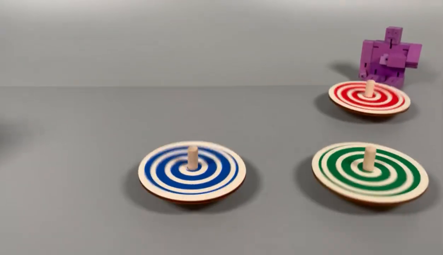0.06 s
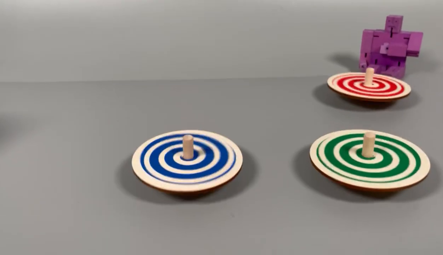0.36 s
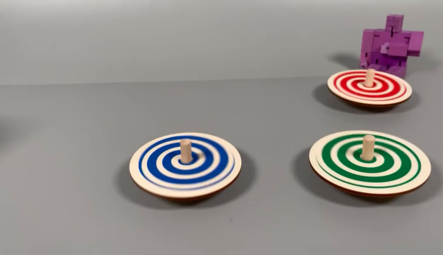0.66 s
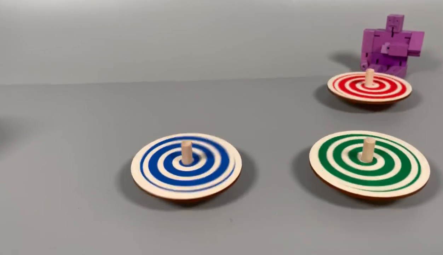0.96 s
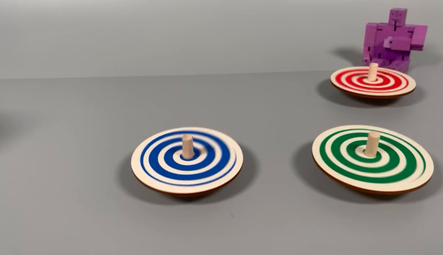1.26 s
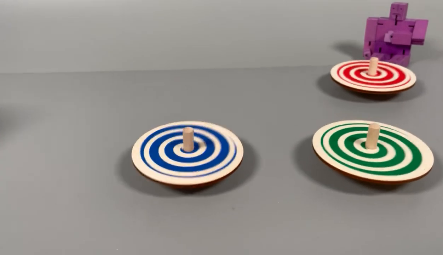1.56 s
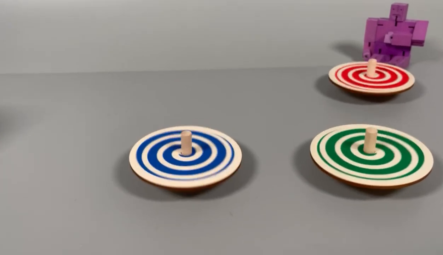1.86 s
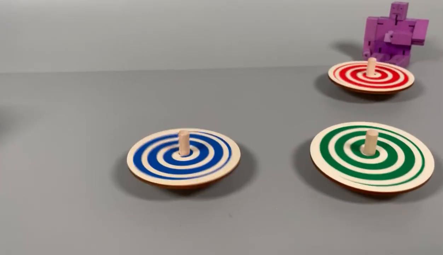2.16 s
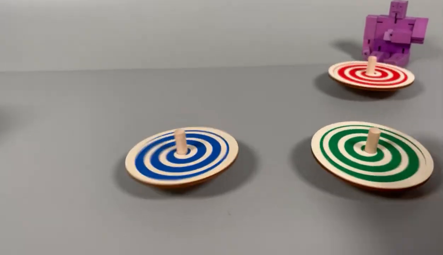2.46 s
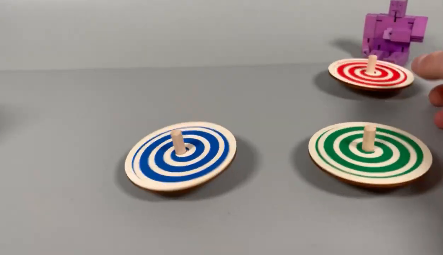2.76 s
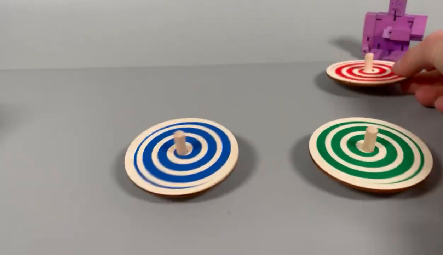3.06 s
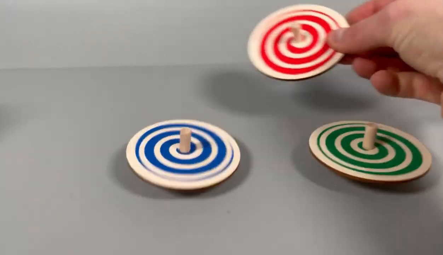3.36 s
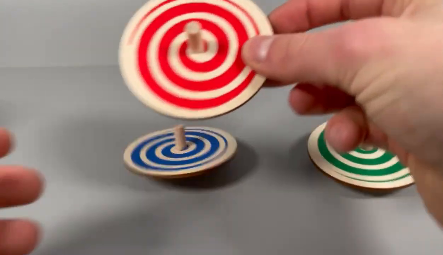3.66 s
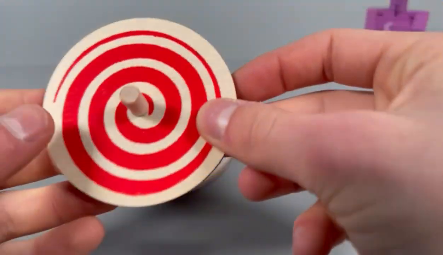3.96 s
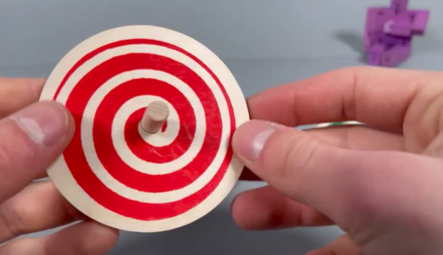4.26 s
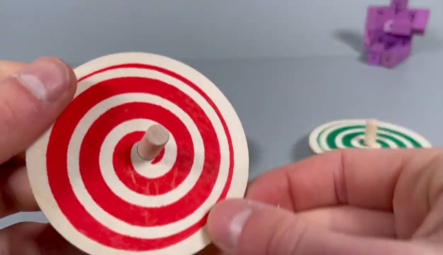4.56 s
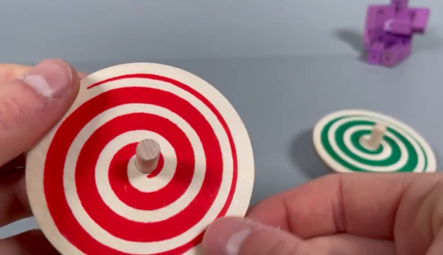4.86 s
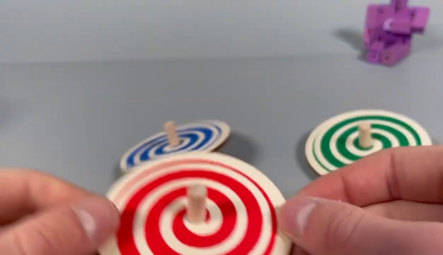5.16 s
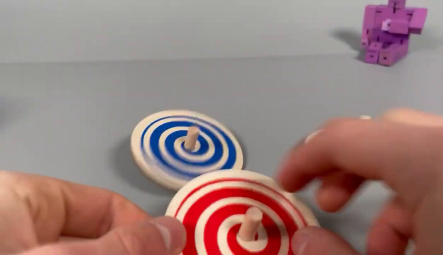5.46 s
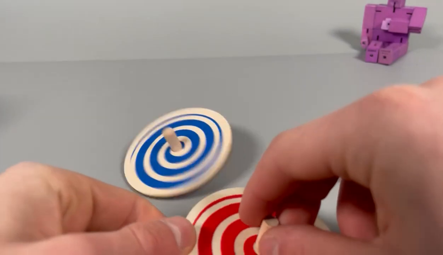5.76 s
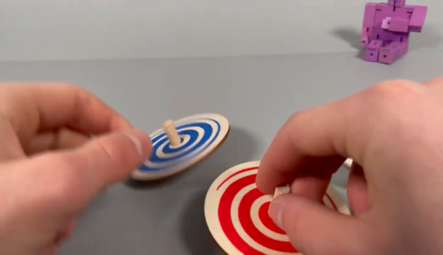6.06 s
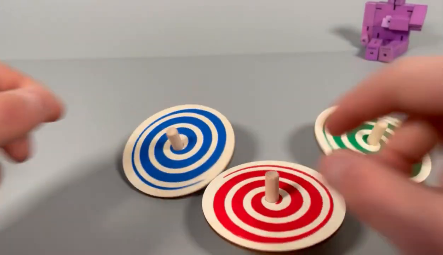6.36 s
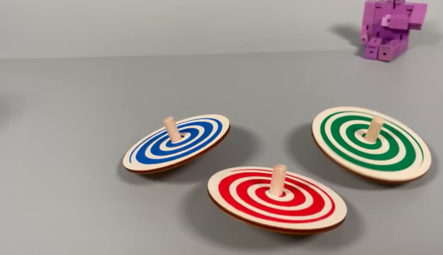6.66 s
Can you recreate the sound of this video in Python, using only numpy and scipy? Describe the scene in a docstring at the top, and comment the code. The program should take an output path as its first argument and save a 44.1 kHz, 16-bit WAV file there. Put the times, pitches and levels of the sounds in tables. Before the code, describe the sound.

Close to a phone microphone in a small room, wooden spinning tops rumble quietly on a tabletop with light clicks and taps. About halfway, one loud knock rings the table as a top is lifted. Soft sleeve swishes and a faint hiss of fingertips follow, then a scratchy rubbing of skin on wood, ending in a second, softer knock as the top is put down.

```python
"""A low rumble, dry clicks and swishing sleeves: three wooden tops wobble on a table in a small room.
Their tips rumble in the board, and a hand knocks the table, setting it ringing, as it picks one top up.
Fingers slide over the disc, rub along it in small slips that ring the wood, and set it down again.
It is all heard close up, through the two microphone ports of a phone."""
import sys
import numpy as np
from scipy import signal
from scipy.fft import rfft, irfft
from scipy.io import wavfile
from scipy.ndimage import uniform_filter1d

SR = 44100
rng = np.random.default_rng(int(sys.argv[2]) if len(sys.argv) > 2 else 0)


def pcm_store(signal):
    """Save signal as 16-bit PCM."""
    levels = np.round(np.clip(np.atleast_2d(signal), -1, 1) * 32767)
    wavfile.write(sys.argv[1], SR, levels.astype(np.int16).T)


N = 295911
T = np.arange(N) / SR
FREQ = np.arange(N + 1) * SR / (2 * N)

# The bright hiss of sliding skin and cloth. Each row: frequency in Hz, level in dB.
SLIDE_HISS = [(2500, -21), (5400, -16.5), (6500, -9), (7500, -11.5), (9300, -5.5), (11600, -9.5),
              (14000, -31)]
# Knocks on the table. Each row: start in seconds, level in dB, thud pitch in Hz, thud t60 in seconds,
# edge and board ring in relative dB, frequency in Hz above which the board is barely excited.
KNOCKS = [(0.932, -40.5, 555, 0.02, -31, -12, 800), (1.011, -41.5, 522, 0.053, -5, -27, 800),
          (1.117, -39.5, 521, 0.036, -19, -2, 800), (1.631, -38, 606, 0.017, -2.5, -7, 900),
          (3.0747, -3, 762, 0.0086, -4, 3.5, 1630), (5.3899, -35.5, 751, 0.0035, 7, 11, 810),
          (5.398, -37.5, 440, 0.028, -15, -15, 600), (5.528, -44, 1600, 0.008, 4, -7, 1000),
          (6.43, -16.5, 572, 0.0094, -10.5, 0.5, 765), (6.464, -33, 532, 0.02, -18, -9, 700)]
# Pressure of the fingers rubbing the held top. Each row: time in seconds, level in dB.
RUB_PRESSURE = [(5.269, -77), (5.286, -55), (5.378, -62), (5.44, -73), (5.5, -60), (5.57, -69),
                (5.61, -52.5), (5.852, -53), (5.94, -54.5), (6.07, -49), (6.17, -50.5), (6.26, -52.5),
                (6.42, -58.5)]


def amp(db):
    """Decibels to gain."""
    return 10 ** (np.asarray(db) / 20)


def noise():
    """White noise of unit power."""
    return rng.standard_normal(N)


def through(x, response):
    """Filter by a frequency response given on FREQ."""
    return irfft(rfft(x, 2 * N) * response)[..., :N]


def unit(response):
    """Scale a response so that white noise keeps its power."""
    return response / np.sqrt(np.mean(np.abs(response) ** 2))


def colour(points):
    """Causal response through (Hz, dB) points, falling 10 dB an octave outside them."""
    hz, db = np.transpose(points)
    octave = np.log2(FREQ + 1)
    outside = np.abs(octave - np.clip(octave, np.log2(hz[0]), np.log2(hz[-1])))
    cepstrum = irfft(np.log(amp(np.interp(octave, np.log2(hz), db) - 10 * outside)))
    return unit(np.exp(rfft(2 * cepstrum[:N], 2 * N)))


def resonances(peaks):
    """Response of parallel (Hz, width in Hz, dB) resonators."""
    return unit(sum(amp(db) * 1j * FREQ * width / (hz ** 2 - FREQ ** 2 + 1j * FREQ * width)
                    for hz, width, db in peaks))


def ring(modes, t):
    """Fading sines of (Hz, dB, t60 in seconds) modes, alternating in sign."""
    return sum((-1) ** k * amp(db - 60 * t / t60) * np.sin(2 * np.pi * hz * t)
               for k, (hz, db, t60) in enumerate(modes))


def add(track, s, sound):
    """Mix a sound into a track at s seconds."""
    start = max(int(s * SR), 0)
    track[start:start + len(sound)] += sound[:N - start]


def swell(t, rise, t60, hold=0):
    """A quick rise, a hold, then an exponential fade."""
    return np.clip(t / rise, 0, 1) * np.exp(-np.log(1000) * np.maximum(t - rise - hold, 0) / t60)


def walk(rate):
    """Random wander with a spread near 1, turning `rate` times a second."""
    size = int(SR / rate)
    return uniform_filter1d(np.repeat(rng.standard_normal(N // size + 1), size), size)[:N]


def burst(shape, bins):
    """Noise under an envelope, its spectrum evened out over `bins` so that no chance pitch sticks out."""
    spectrum = rfft(shape * rng.standard_normal(len(shape)), 2 * len(shape))
    power = signal.fftconvolve(np.abs(spectrum) ** 2, signal.windows.hann(bins), mode="same")
    flat = irfft(spectrum / np.sqrt(power))[:len(shape)]
    return flat * np.linalg.norm(shape) / np.linalg.norm(flat)


def room_tone(level_db=-69):
    """Still room noise, alike on both sides in the bass."""
    tone = colour([(25, -9), (120, 8), (370, -9.5), (3500, -27), (7500, -32.5),
                   (11800, -34.5), (13500, -51)])
    side = through(noise(), tone * np.minimum(FREQ / 1200, .8))
    return amp(level_db) * (through(noise(), tone) + np.array([side, -side]))


def table_rumble(wobble_db=-2.5, settled_db=-74.5, hand_db=-16, uneven_db=2):
    """Wobbling tips and rubbing hands rumble in the board; deep down it sways in one broad swell."""
    # The push of the wobbling tops. Each row: time in seconds, level in dB.
    wobble = [(0.52, -68), (1.02, -56), (1.45, -61), (1.68, -54.5), (1.89, -82), (1.96, -58.5),
              (2.6, -67.5), (2.7, -73)]
    # The tone of the rumble. Each row: frequency in Hz, level in dB.
    rumble_tone = [(50, -9.5), (120, 1), (200, -2.5), (300, -13), (600, -15), (1200, -28), (3000, -29)]
    s, db = np.transpose(wobble)
    tips = amp(np.interp(T, s, db) + wobble_db) * (T >= s[0]) * (T <= s[-1])
    push = np.maximum(tips, amp(settled_db)) + amp(hand_db) * rub_pressure()
    sway = amp(-73.5 + 16 * np.exp(-((T - 1.55) / 0.87) ** 2))
    rumble = through(noise() + 0.26 * np.array([noise(), noise()]), colour(rumble_tone))
    bass = through(noise(), resonances([(50.7, 14, 0)]) * resonances([(53.5, 10, 0)]))
    return (rumble * push + bass / np.std(bass) * sway) * amp(uneven_db * walk(11))


def sleeves(scuff_db=-37, hum_db=-14):
    """Cloth brushes in short swishes, each round its own pitch, after one duller, heavier scuff."""
    # Each row: start in seconds, level in dB, treble in relative dB, band centre in Hz,
    # band level in relative dB.
    swishes = [(0.297, -60.5, -20, 1080, 12.5), (0.549, -64, -1, 3120, 13.5), (0.689, -63.5, -16, 3700, 10),
               (.82, -62, -4.5, 2800, -7), (1.475, -58, -7, 3560, -16), (1.578, -60.5, -10, 2240, 11.5),
               (1.755, -66, -9.5, 3900, 10), (1.921, -63, 2.5, 2760, 19), (2.294, -62, -17, 1830, 2),
               (2.941, -62, 2, 5000, 15), (3.374, -86.5, -9.5, 6040, 17.5), (3.451, -80, -11, 5440, 13),
               (3.601, -75.5, -26, 3820, 18.5), (3.683, -67.5, -16.5, 3880, 9),
               (3.792, -71.5, -10.5, 3700, 5.5), (3.888, -70, -21, 3830, 11), (3.949, -74.5, -5, 4080, 9),
               (4.136, -81, -14, 3530, 15.5), (4.226, -75, -8.5, 3940, 9), (4.315, -67.5, -8, 1494, 3),
               (4.567, -68.5, -3.5, 3190, 12.5), (4.766, -70, -11, 2463, 15), (4.96, -67.5, -16, 2300, 1.5),
               (5.105, -73.5, -19.5, 4100, 9)]
    # The tones of the swishes and of the scuff. Each row: frequency in Hz, level in dB.
    cloth_tone = [(300, 5), (1200, 5), (4000, -0.5), (7000, -10.5), (11500, -18.5), (14000, -44.5)]
    scuff_tone = [(120, -6), (400, -10), (800, 0), (1350, 2.5), (2000, -7.5), (3800, -21), (11200, -22),
                  (14000, -31)]
    body, treble, bands, t = np.zeros(N), np.zeros(N), np.zeros(N), T[:SR]
    for s, db, treble_db, hz, band_db in swishes:
        shape = amp(db) * swell(t, rise=0.015, t60=0.34)
        band = np.concatenate(signal.iirpeak(hz, Q=2.3, fs=SR))
        add(body, s, shape)
        add(treble, s, shape * amp(treble_db))
        add(bands, s, shape * amp(band_db) * signal.sosfilt([band, band], rng.standard_normal(len(t))))
    cloth = through(body * noise(), colour(cloth_tone)) + bands
    cloth += through(treble * noise(), colour(SLIDE_HISS))
    scuff = amp(scuff_db) * swell(T, rise=0.0051, t60=0.14) * noise()
    table_hum = amp(hum_db) * resonances([(170, 140, 0)])
    return cloth * amp(0.79 * walk(120)) + through(scuff, colour(scuff_tone) + table_hum)


def clicks(fade_s, ping_db, rise_s=0.0039, fade_from_s=0.0041, ping_t60=0.004):
    """Each dry click is a few milliseconds of chatter that rings one short resonance."""
    # Each row: start in seconds, level in dB, ring pitch in Hz, ring level in relative dB.
    snaps = [(0.344, -35, 4970, 2), (0.945, -32, 4180, -1.5), (0.955, -48, 4270, -3),
             (1.0788, -35.5, 5130, 0.5), (1.0831, -43.5, 4730, -20), (1.199, -38, 4600, 7.5),
             (1.2109, -42.5, 4380, 3), (1.3479, -37, 4170, 4), (2.007, -33, 4550, 4),
             (2.138, -35.5, 4930, -8), (2.145, -37, 4500, -2.5), (3.030, -30.5, 4900, -2),
             (3.043, -29.5, 5287, -5), (5.2179, -52, 8900, 5.5)]
    # The tone of the chatter. Each row: frequency in Hz, level in dB.
    chatter_tone = [(100, -14.5), (500, 2), (1300, -1), (2500, -12), (3600, -3), (5500, 4.5), (7000, -4.5),
                    (8100, 5), (9700, -1), (11600, 7), (12700, -2), (14000, -39.5)]
    chatter, pings, t = np.zeros(N), np.zeros(N), T[:SR // 4]
    shape = np.minimum(t / rise_s, 1) * np.exp(-np.maximum(t - fade_from_s, 0) / fade_s)
    for s, db, hz, ring_db in snaps:
        snap = burst(shape, bins=400)
        ping = signal.fftconvolve(snap, ring([(hz, 0, ping_t60)], t))
        ping *= np.linalg.norm(snap) / np.linalg.norm(ping)
        add(chatter, s, amp(db) * snap)
        add(pings, s, amp(db + ring_db + ping_db) * ping)
    return through(chatter, colour(chatter_tone)) + pings


def after_ring(start_s=0.347):
    """The first click leaves a top ringing thinly in a close pair of modes."""
    return ring([(4830, -64, .2), (4700, -66, .3)], np.maximum(T - start_s, 0))


def knocks(edge_t60, tick_db, tick_growth=2.5, lag_s=.0007, return_s=.0071, return_db=-16.5):
    """A blow gives a bright edge, then a hard tick and a thud that run to and fro in the table."""
    # The modes of the tick. Each row: pitch in Hz, level in dB, t60 in seconds.
    tick_modes = [(4140, -6.5, .0095), (4220, -14.5, .008)]
    # The tone of the edge. Each row: frequency in Hz, level in dB.
    edge_tone = [(300, 6), (1000, -5.5), (1250, -3), (1800, -4), (2300, -13), (2800, -6), (3200, -8),
                 (4000, -10.5), (4600, -16), (6400, -15), (9500, -23), (11400, -13), (13500, -21)]
    wood, edges, t = np.zeros(N), np.zeros(N), T[:SR // 4]
    for s, db, hz, t60, edge_db, _, _ in KNOCKS:
        thud = ring([(hz, 0, t60)], t) * np.minimum(6 * t / t60, 1)  # longer thuds swell more slowly
        tick = amp(tick_growth * db + tick_db) * ring(tick_modes, t)  # harder contacts are brighter
        edge = burst(swell(t, rise=0.0013, t60=edge_t60), bins=300)
        add(wood, s + lag_s, amp(db + 4) * thud + tick)
        add(edges, s, amp(db + edge_db - 8) * edge)
    # Each return from the table's rim is weaker and duller.
    round_trip = amp(return_db) * np.exp(-2j * np.pi * FREQ * return_s) / (1 + (FREQ / 2000) ** 2)
    return through(wood, 1 / (1 - round_trip)) + through(edges, colour(edge_tone))


def board_ring(spread=.6):
    """Every knock leaves the table ringing, a soft one only in its low modes."""
    # The modes of the board. Each row: pitch in Hz, level in dB, t60 in seconds.
    board_modes = [(76, -30, .33), (148, -30, .28), (216, -33, .22), (271, -36, .18), (306, -26.5, .21),
                   (380, -24, .18), (470, -26, .07), (500, -25, .09), (535, -23, .09), (585, -24, .14),
                   (647, -24, .13), (714, -25, .13), (792, -25, .11), (861, -25, .13), (953, -29, .14),
                   (1005, -28, .12), (1071, -26, .13), (1260, -29, .06), (1400, -29, .06), (1576, -39, .13),
                   (1802, -34, .12), (1947, -33, .08)]
    mid, t = np.zeros(N), T[:SR // 3]
    filling = np.minimum(t / 0.012, 1)  # bending waves take a moment to fill the board
    for s, db, _, _, _, board_db, cutoff_hz in KNOCKS:
        modes = [(hz, mode_db - 10 * np.log10(1 + (hz / cutoff_hz) ** 6), t60)
                 for hz, mode_db, t60 in board_modes]
        add(mid, s, amp(db + board_db) * ring(modes, t) * filling)
    # The broad board reaches each port a little differently.
    side = through(mid, spread * np.minimum(FREQ / 500, 1) * np.exp(-2j * np.pi * FREQ * 0.002))
    return mid + np.array([side, -side])


def bumps(hum_hz=141, width_hz=110):
    """Soft pushes of tops and hands on the table give only a brief low hum."""
    # Each row: start in seconds, level in dB.
    pushes = [(1.63, -53.5), (1.96, -55.5), (4.049, -65), (4.77, -64), (4.97, -57), (5.29, -59.5),
              (5.385, -52), (6.03, -59)]
    push = sum(amp(db) * swell(T - s, rise=0.021, t60=0.51) for s, db in pushes)
    return through(push * noise(), unit(resonances([(hum_hz, width_hz, 0)]) ** 2))


def finger_strokes(rise_s=0.04, grain_db=2):
    """Fingertips hiss faintly as they slide over the smooth disc."""
    # Each row: start in seconds, length in seconds, level in dB.
    strokes = [(2.684, 0.44, -74.5), (4.019, 0.14, -75), (4.247, 0.32, -74.5), (4.375, 0.058, -72.5),
               (4.553, 0.17, -71), (4.737, 0.13, -75.5), (4.893, 0.14, -64), (6.469, 0.16, -72.5)]
    pressure = sum(amp(db) * swell(T - s, rise_s, t60=0.063, hold=length - rise_s)
                   for s, length, db in strokes)
    return through(noise() * pressure * amp(grain_db * walk(270)), colour(SLIDE_HISS))


def rub_pressure():
    """The fingers press on the held top, then let go."""
    s, db = np.transpose(RUB_PRESSURE)
    return amp(np.interp(T, s, db)) * swell(T - s[0], rise=0.0032, t60=1, hold=s[-1] - s[0])


def stick_slip(level_db=-4, slips_per_s=46, octaves_per_s=2.9, jerkiest_s=5.63):
    """Friction force: the slips come faster as the fingers speed up, and are jerkiest partway through."""
    rate = slips_per_s * 2 ** (octaves_per_s * np.maximum(T - RUB_PRESSURE[0][0], 0))
    phase = np.cumsum(rate * np.exp(.12 * walk(80))) / SR
    jerk_db = 11 + 14 * np.exp(-((T - jerkiest_s) / 0.24) ** 2)
    jerks = amp(jerk_db * np.exp(-(phase % 1) / 0.53) + 2 * walk(150))
    return rub_pressure() * amp(level_db) * jerks / np.sqrt(uniform_filter1d(jerks ** 2, size=2048))


def gripped_ring(force, path, width_hz):
    """Friction drives one resonance of the disc, which the shifting grip bends and damps."""
    s, hz, db = np.transpose(path)
    carrier = np.exp(2j * np.pi * np.cumsum(np.interp(T, s, hz)) / SR)
    pole = np.exp(-np.pi * width_hz / SR)
    drive = force * amp(np.interp(T, s, db)) * noise()
    return np.real(carrier * signal.lfilter([np.sqrt(2 * (1 - pole ** 2))], [1, -pole], drive / carrier))


def rubbing(rasp_db=4, flicker_db=4, hiss_db=-3):
    """Skin sticks and slips on the wood; every slip is a tiny burst that rings the disc."""
    # The hardest single slips. Each row: start in seconds, level in dB, low ring in relative dB.
    hard_slips = [(4.036, -51.5, -20), (4.043, -57.5, -17), (5.2812, -56, 18), (5.2936, -53.5, -17),
                  (5.3381, -50.5, -8), (5.349, -48, -9), (5.3838, -45, 4), (5.406, -50, -3),
                  (5.425, -44, -18), (5.4772, -51.5, -20), (5.542, -51.5, 13.5), (5.56, -62, -5),
                  (5.578, -44, -12), (5.7501, -51.5, -26), (5.7782, -47.5, -1), (5.823, -58, 18.5),
                  (5.8385, -52, 17)]
    # The paths of the disc's three rings. Each row: time in seconds, pitch in Hz, relative level in dB.
    low_path = [(5.3, 2600, -14.5), (5.66, 2400, -8.5), (5.84, 2400, -1.5), (5.9, 2400, -12),
                (6.11, 2670, -4), (6.22, 2340, -10), (6.42, 2420, -13.5)]
    mid_path = [(5.25, 6470, -20), (5.29, 6520, -5.5), (5.44, 6070, -9), (5.51, 6440, 1.5),
                (5.56, 5940, -6.5), (5.84, 6030, -6.5), (5.89, 6150, -19)]
    high_path = [(5.55, 8000, -13), (5.76, 8200, -1.5), (5.87, 8100, -10), (5.98, 8060, -9),
                 (6.07, 7800, -1.5), (6.23, 8100, -9.5), (6.41, 8050, -2.5), (6.439, 8000, -16)]
    # The disc's broad treble resonances. Each row: centre in Hz, width in Hz, level in dB.
    treble_peaks = [(9540, 800, 4.5), (11310, 940, 4)]
    # How hard the rub drives them. Each row: time in seconds, relative level in dB.
    treble_levels = [(5.4, -1), (5.97, -1.5), (6.13, -2), (6.3, -11)]
    # The tone of the friction hiss. Each row: frequency in Hz, level in dB.
    hiss_tone = [(100, -12), (400, -4), (1000, -2), (2000, -7), (2800, -5), (3600, -10.5), (4800, -11),
                 (7000, -15), (12000, -18.5), (14000, -48)]
    force = stick_slip()
    low_force = force * amp(rasp_db * walk(45))
    for s, db, ring_db in hard_slips:
        slip = amp(db) * swell(T[:2048], rise=0.00265, t60=0.0048)
        add(force, s, slip)
        add(low_force, s, slip * amp(ring_db))
    rings = gripped_ring(low_force, low_path, width_hz=150)
    rings += gripped_ring(force, mid_path, width_hz=190)
    rings += gripped_ring(force, high_path, width_hz=260)
    treble_gain = amp(np.interp(T, *np.transpose(treble_levels)) + flicker_db * walk(22))
    treble = through(force * treble_gain * noise(), resonances(treble_peaks))
    hiss = amp(hiss_db) * through(force * noise(), colour(hiss_tone))
    return rings + treble + hiss


def near_reflections(x):
    """The direct sound and two close echoes, each reaching left and right slightly apart."""
    # Each row: left delay in seconds, right delay in seconds, gain.
    echoes = [(.0069, .0072, 0.28), (0.0145, 0.0139, 0.16)]
    paths = 1 + sum(gain * np.exp(-2j * np.pi * FREQ * np.array([[left], [right]]))
                    for left, right, gain in echoes)
    return through(x, paths)


def room_tail(x):
    """Diffuse tail of a small room; the two ports share its bass."""
    # How long the room rings. Each row: frequency in Hz, t60 in seconds.
    decay_times = [(100, 0.47), (500, 0.46), (2000, 0.52), (5000, 0.34), (12000, 0.12)]
    hz, t60s = np.transpose(decay_times)
    mid, side, t = 0, 0, T[:SR // 2]
    for weights, t60 in zip(np.eye(len(hz)), t60s):
        band = np.interp(FREQ, hz, weights)
        shape = swell(t, rise=0.0019, t60=t60)
        tails = rfft([burst(shape, bins=110) for _ in range(2)], 2 * N) * np.sqrt(band)
        mid, side = mid + tails[0], side + tails[1]
    width = np.interp(FREQ, [100, 900, 6000, 8500], [0.096, 0.94, 0.34, 0.037])
    return through(x, (unit(mid) + np.array([[1], [-1]]) * width * unit(side)) / np.sqrt(1 + width ** 2))


def scene():
    """Tops, hands and table up close, with the small room around them."""
    cloth, fingers = sleeves(), finger_strokes() + rubbing()
    blows = clicks(fade_s=0.0021, ping_db=-6) + knocks(edge_t60=0.027, tick_db=4)
    # Blows reach the walls by many paths, so the room hears them smeared.
    smeared_blows = clicks(fade_s=.009, ping_db=-13) + knocks(edge_t60=.07, tick_db=-14)
    near = near_reflections(blows + fingers + cloth)
    far = room_tail(amp(-13) * smeared_blows + amp(-5) * fingers + cloth)
    return near + far + after_ring() + board_ring() + table_rumble() + bumps() + room_tone()


def record(dry, port_hz=10350, port_width_hz=750, port_db=7, cutoff_hz=15800):
    """The microphone ports resonate in the treble and differ in phase and level; the highs are cut."""
    # Left port against right. Each row: frequency in Hz, phase lead in radians, level in dB.
    ports = [(1500, -.3, -2.5), (4000, -.4, -2), (5300, -1.2, -3), (7000, -.7, -7), (7700, -1.5, -2),
             (8800, 0, 0), (10350, 3.14, 0), (11800, 6.2, 0), (12400, 6.5, 0), (14900, 12.5, 0)]
    hz, lead, tilt_db = np.transpose([(0, 0, 0)] + ports)
    lead, tilt_db = np.interp(FREQ, hz, lead), np.interp(FREQ, hz, tilt_db)
    sides = np.array([[.5], [-.5]])
    peak_db = port_db / (1 + ((FREQ - port_hz) / port_width_hz) ** 2)
    shelf_db = np.interp(FREQ, [12200, 13400], [0, -14])
    heard = through(dry, amp(peak_db + shelf_db + sides * tilt_db) * np.exp(1j * sides * lead))
    return signal.sosfilt(signal.ellip(8, .2, 70, cutoff_hz, fs=SR, output="sos"), heard)


dry = scene()
out = record(dry)
pcm_store(out)
```